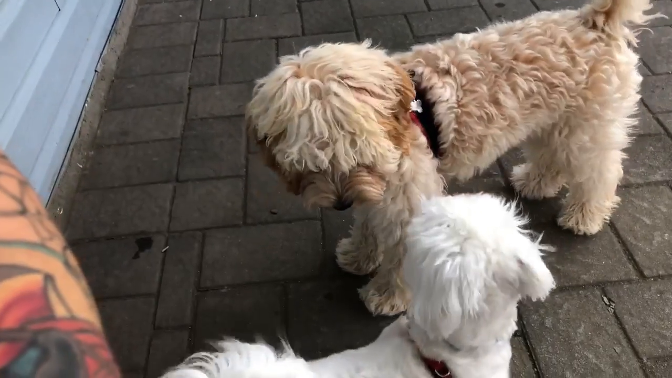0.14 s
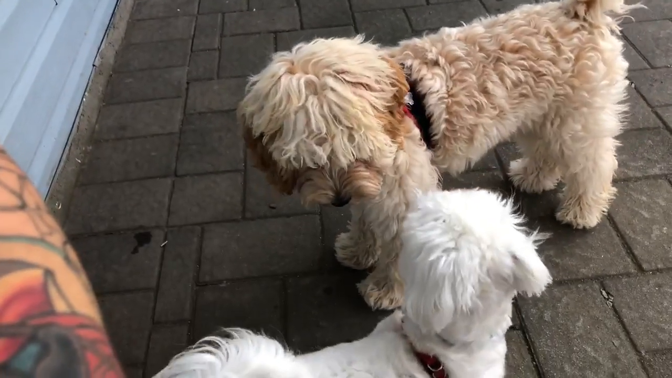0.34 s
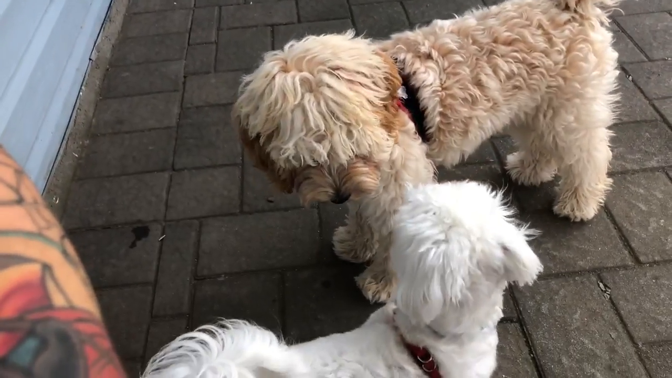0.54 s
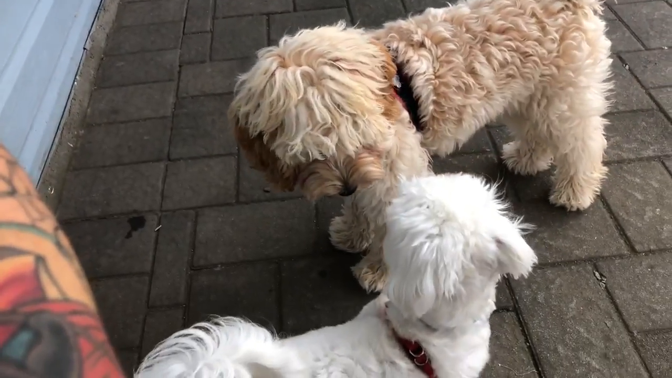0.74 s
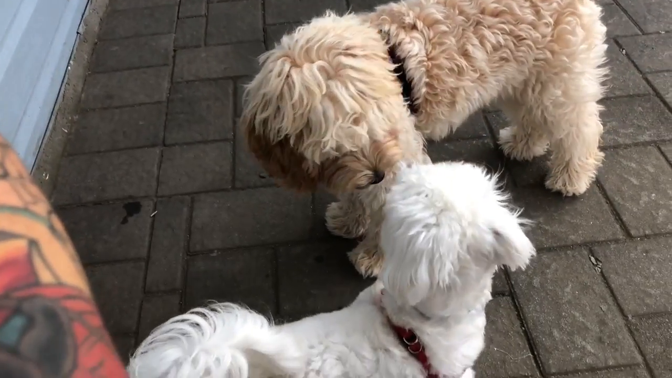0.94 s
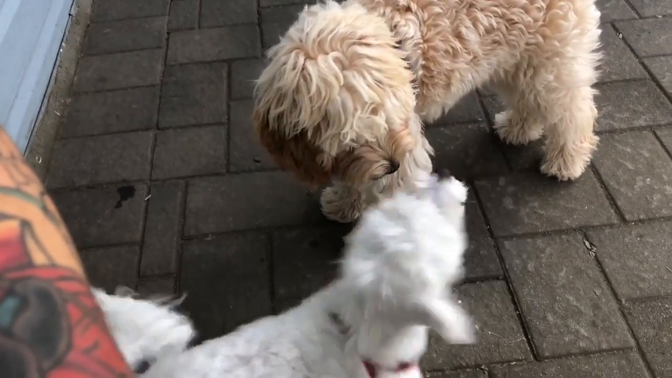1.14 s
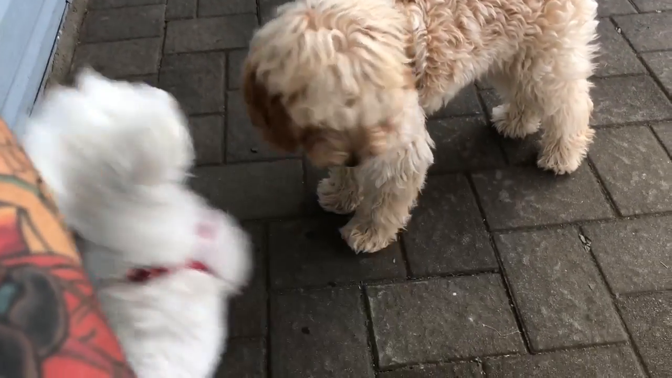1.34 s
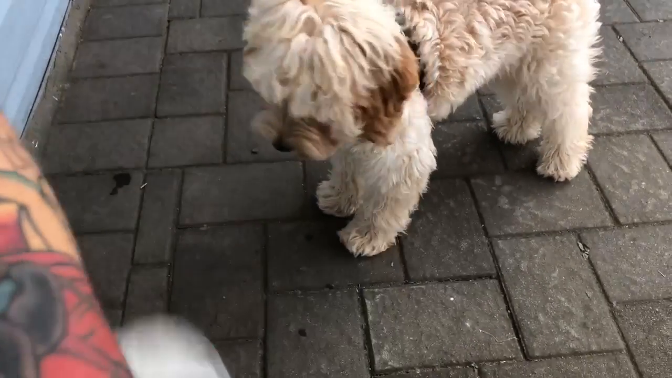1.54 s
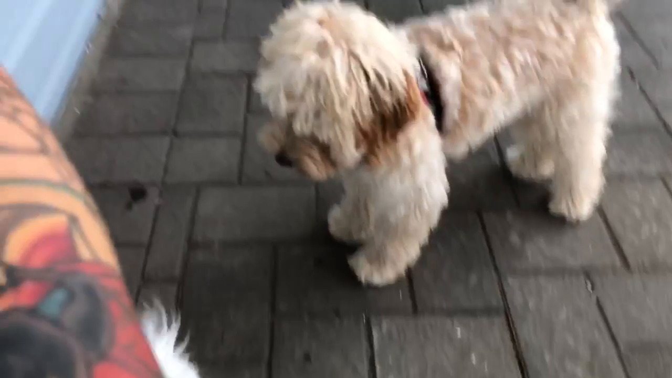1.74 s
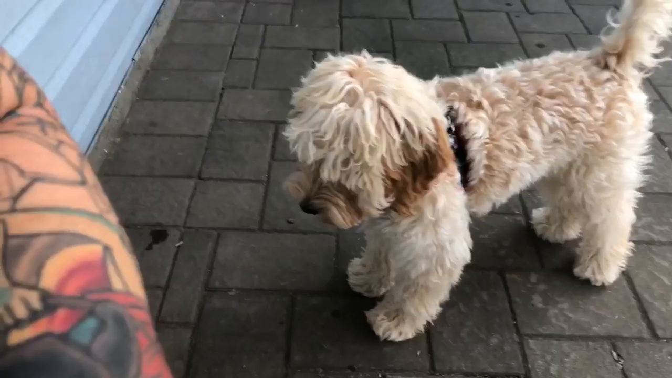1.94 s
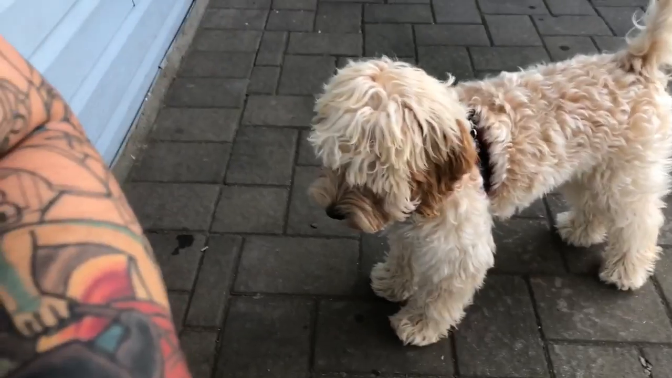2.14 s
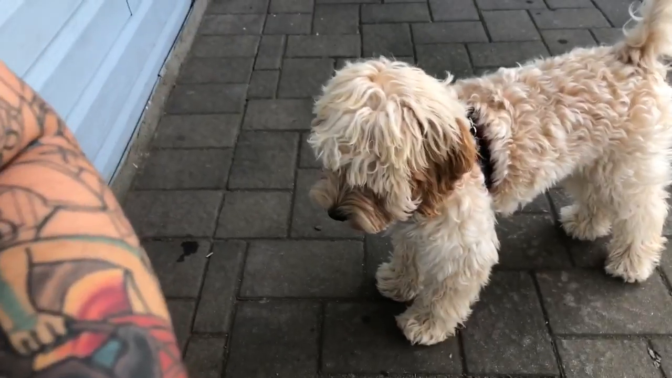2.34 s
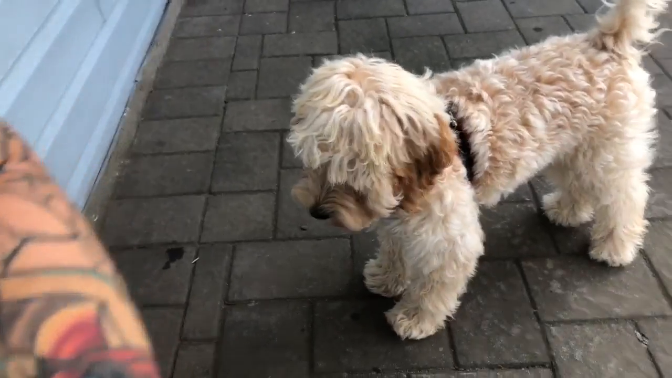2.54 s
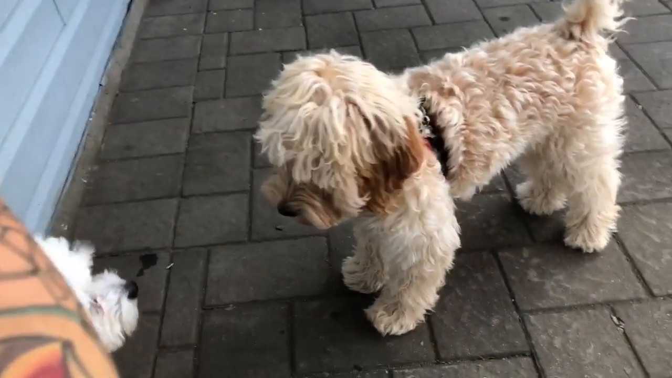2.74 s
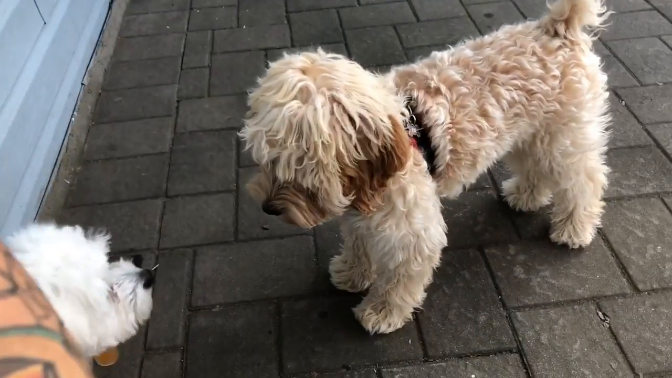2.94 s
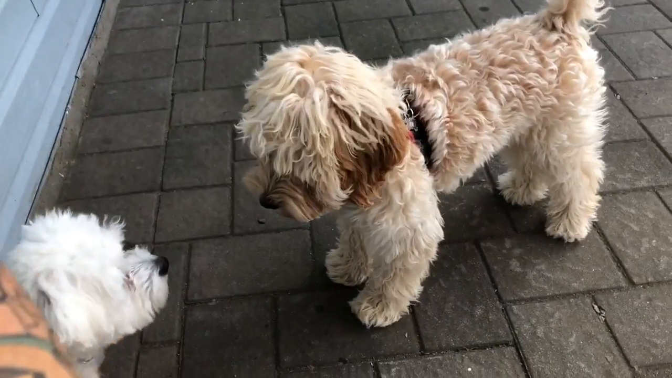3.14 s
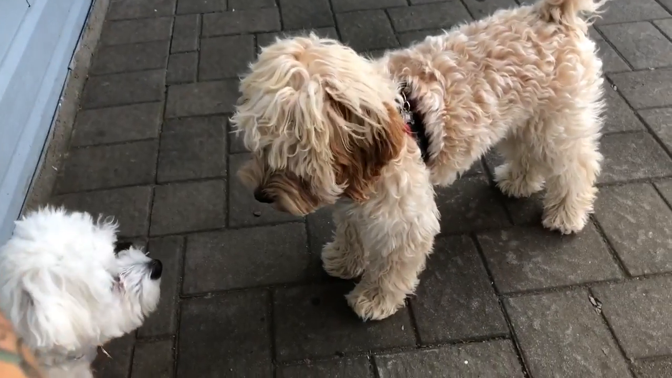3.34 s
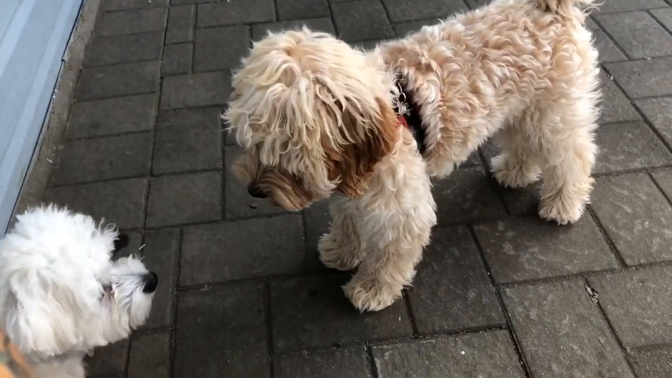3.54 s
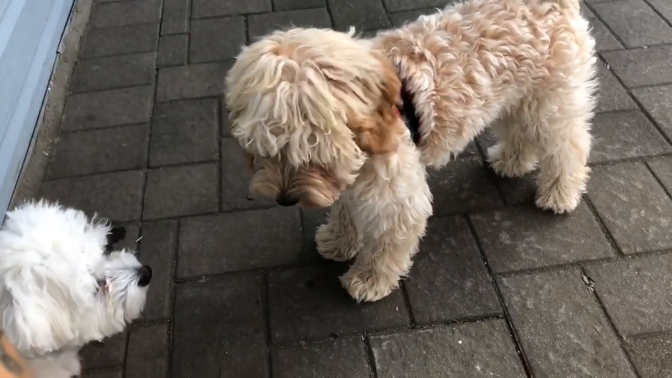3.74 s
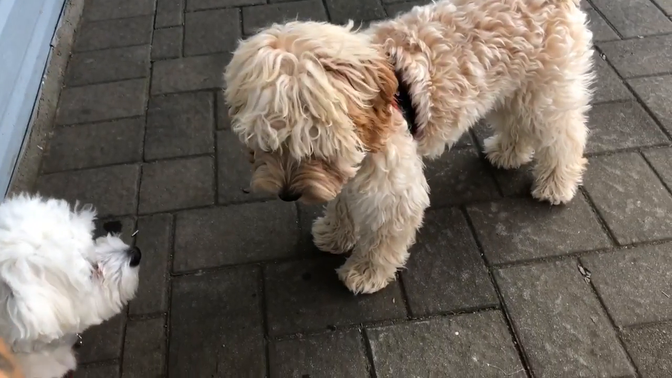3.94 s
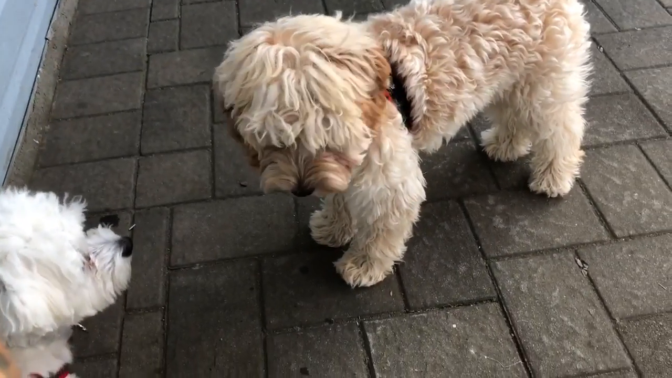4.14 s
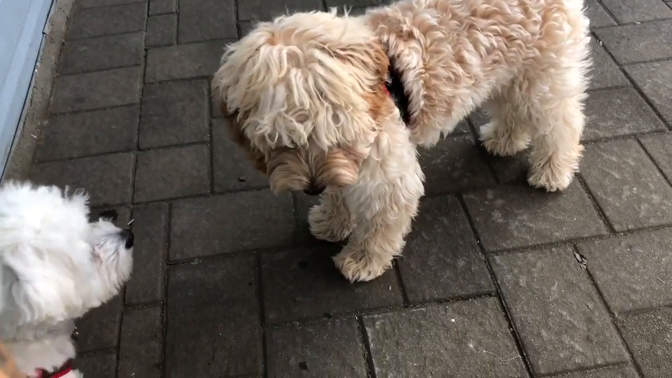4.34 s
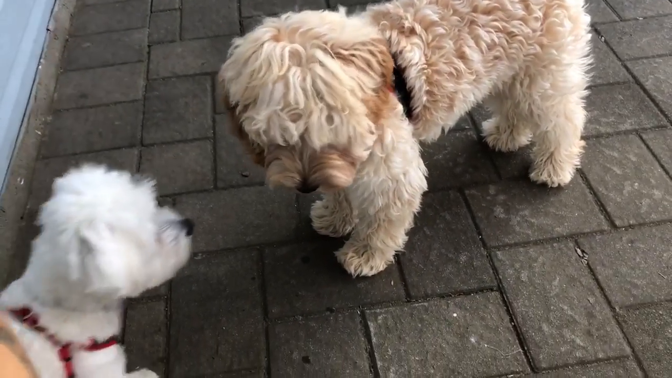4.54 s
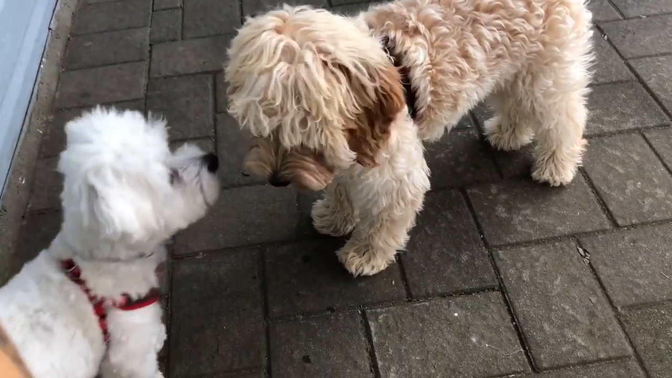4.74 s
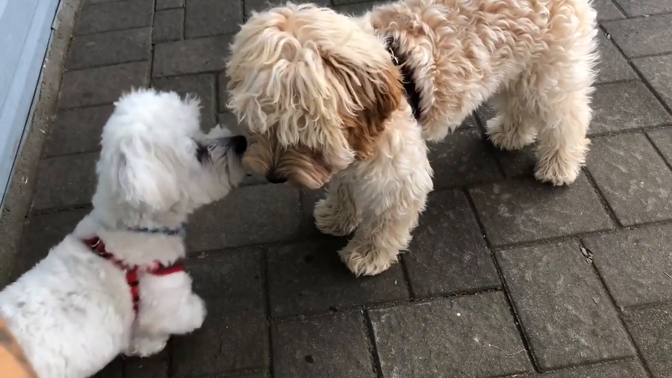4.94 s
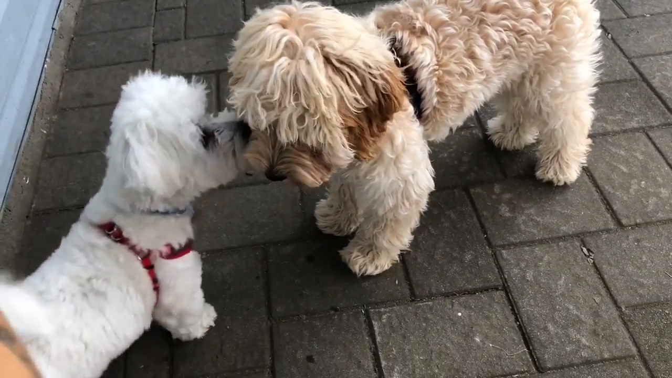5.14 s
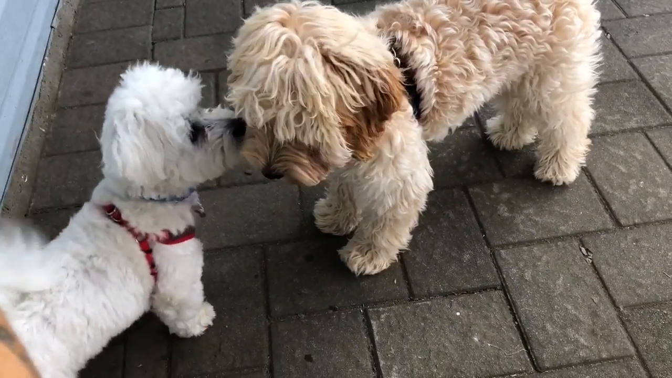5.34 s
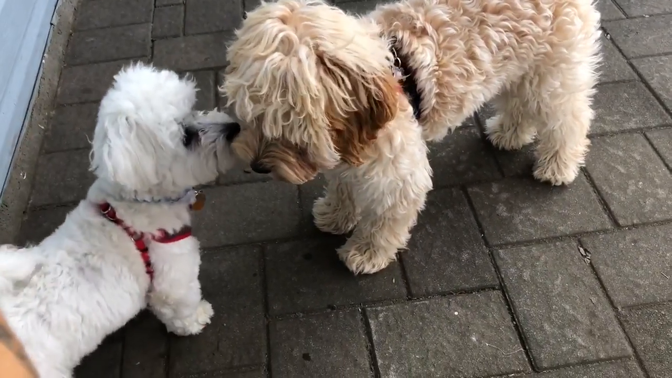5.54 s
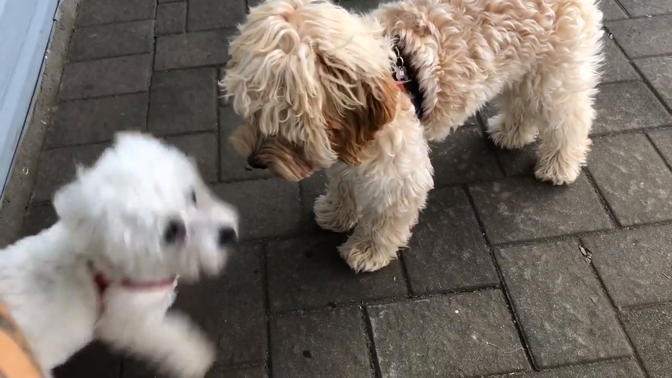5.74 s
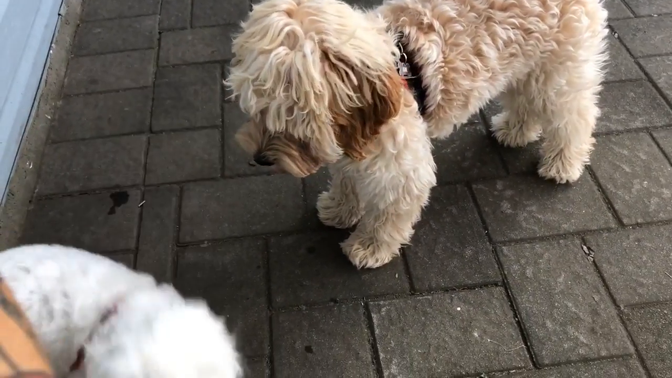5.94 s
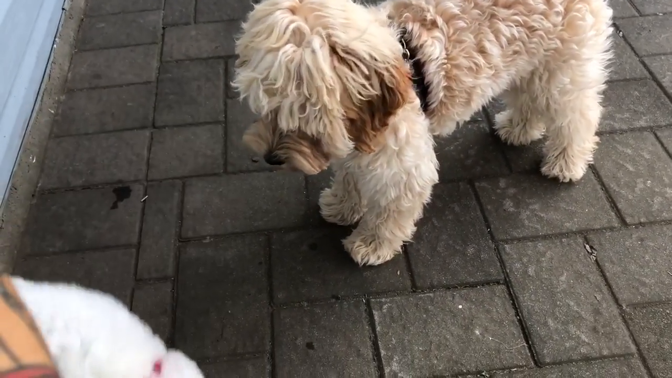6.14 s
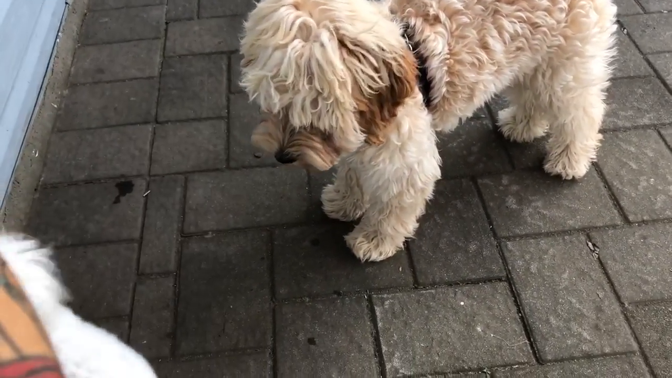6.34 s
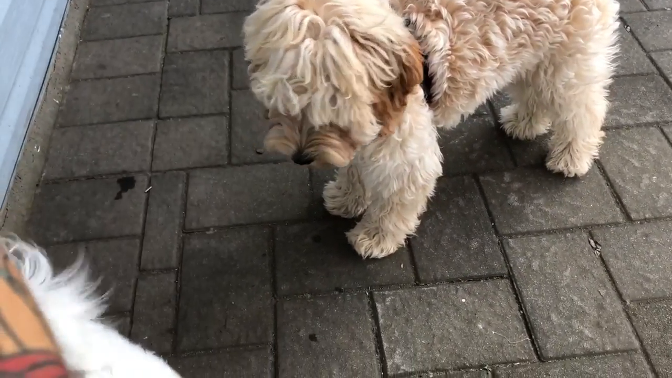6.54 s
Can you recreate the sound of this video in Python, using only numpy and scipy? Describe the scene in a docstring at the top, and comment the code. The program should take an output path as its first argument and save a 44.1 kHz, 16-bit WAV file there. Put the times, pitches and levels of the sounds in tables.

```python
"""Two dogs shuffle about on a paved yard, under far bird calls and over a low outdoor rumble.
Soft rattles of a dog's collar open the scene: modal tags and ring, driven by showers of contacts.
A far bird chirps in pitched noise; then the rattles grow hard and dense, with fur and strap rustling.
Amid them two rubs squeak as falling stick-slip tones; paws scuff here and there in swells of noise.
After a calmer stretch of hoarse calls, a second, mostly softer group of rattles ends the scene."""
import sys
import numpy as np
from scipy import signal
from scipy.fft import rfft, irfft
from scipy.io import wavfile
from scipy.ndimage import uniform_filter1d

SR = 44100
rng = np.random.default_rng(int(sys.argv[2]) if len(sys.argv) > 2 else 0)


def to_wav(sig):
    """Store sig (one row per channel, or 1-D mono) as 16-bit WAV at the path in sys.argv[1].

    Samples outside -1..1 are clipped; the rate is SR.
    """
    pcm = np.clip(np.atleast_2d(sig), -1, 1) * 32767
    pcm = np.round(pcm).astype(np.int16)
    wavfile.write(sys.argv[1], SR, pcm.T)  # frames by channels


N = 294588

# rattles on the collar, levels before the collar mix:
# [blow_s, decay_s, blow_db, scrape_db, top_modes_extra_db, struck_piece]
RATTLES = [ (0.047, 0.035, -48.5, -57, -3, "ring"), (0.063, 0.023, -55, -53, 2.5, "ring"),
           (0.109, 0.014, -44.5, -61, -12, "big"), (.137, 0.017, -52, -53, -3, "ring"),
           (0.261, 0.018, -45, -54, -9, "ring"), (0.276, 0.01, -54, -47.5, 3, "small"),
           (.466, .004, -60.5, -65.5, -2, "big"), (1.235, 0.0079, -42.5, -55, 0, "ring"),
           (1.252, 0.0081, -33.5, -44, -7, "big"), (1.336, 0.0054, -39, -33, 3, "small"),
           (1.343, 0.0075, -31, -54, -14.5, "ring"), (1.361, .011, -44, -60, -20, "big"),
           (1.37, 0.0044, -36.5, -53, -19, "ring"), (1.412, 0.022, -38, -47, -7, "ring"),
           (1.439, 0.0053, -38, -34.5, -13, "ring"), (1.449, 0.009, -24, -47, -13, "small"),
           (1.527, 0.0099, -43, -60, -10, "big"), (1.622, .02, -53, -62, -6, "ring"),
           (1.641, 0.023, -46.5, -38.5, 7, "ring"), (1.664, 0.029, -36.5, -55, -9, "ring"),
           (1.699, 0.011, -47, -58, 8, "ring"), (1.754, 0.021, -44.5, -47, -8, "ring"),
           (1.839, 0.026, -46.5, -45, 1, "ring"), (1.9, 0.014, -37, -46, -9, "big"),
           (1.943, 0.032, -47.5, -66, -9, "small"), (2.016, 0.016, -51.5, -60.5, 5, "ring"),
           (2.26, 0.02, -57, -58, 6, "ring"), (2.419, 0.023, -44.5, -45.5, -7, "small"),
           (2.502, 0.022, -48.5, -52, -6, "big"), (2.658, 0.0048, -62, -63, -6, "ring"),
           (3.26, .005, -67, -66, -1, "small"), (5.014, 0.0036, -56, -50, -4, "big"),
           (5.05, 0.0069, -39.5, -40, 5.5, "ring"), (5.071, 0.0076, -49, -40.5, 7, "small"),
           (5.256, 0.005, -56, -50.5, -2, "ring"), (5.392, 0.0068, -65, -56, 11, "small"),
           (5.545, .002, -72, -63, 0, "ring"), (5.811, 0.0079, -61, -49, 2, "ring"),
           (5.887, 0.017, -62, -60.5, -2, "ring"), (5.943, 0.017, -38, -45.5, -11, "ring"),
           (6.019, 0.018, -42, -47.5, 2, "big"), (6.155, 0.024, -64.5, -70, -13, "ring"),
           (6.473, 0.019, -60, -59, 2, "small"), (6.599, .026, -69.5, -67, 9, "small")]
# vibration modes of a small tag: [pitch_hz, level_db, free_t60_s]
SMALL_TAG = [(6688, 0, .28), (9240, -13, .12), (11283, 0, .27), (11335, -8, .2), (16520, -9, .2)]
# vibration modes of a big tag: [pitch_hz, level_db, free_t60_s]
BIG_TAG = [(3575, -13, .55), (6215, -7, .13), (6712, -5, .25), (13424, -3.5, .29), (13487, -4, .27),
           (14725, -7.5, .2), (14835, -1.5, .22)]
# vibration modes of the collar ring: [pitch_hz, level_db, free_t60_s]
COLLAR_RING = [(3945, -20, .2), (6065, -6, .15), (6128, -3, .18), (11970, -11, .12), (12050, -7, .18),
               (12128, -3, .24), (12205, -9, .18), (12322, -6, .3), (14340, -11, .1), (14495, -4, .2),
               (14555, -8, .14)]
# pieces on the collar, by name: [modes, level_when_neighbour_is_struck_db]
PIECES = {"small": (SMALL_TAG, -21.5), "big": (BIG_TAG, -2.5), "ring": (COLLAR_RING, -11.5)}
# colour of metal scraping on metal: [frequency_hz, gain_db]
SCRAPE_COLOUR = [(150, -36), (400, -25), (1200, -19), (2700, -35), (4200, 2), (5300, -11.5), (6300, 12),
                 (7600, 5), (9200, 0), (10700, -3.5), (12200, 1), (13000, -4), (14700, 1.5), (17000, 1)]
# how briskly the dogs turn, as a level that steers rustle and grazes: [time_s, level_db]
MOVEMENT = [(1.05, -90), (1.186, -53), (1.318, -61), (1.396, -62), (1.844, -49.5), (1.878, -43),
            (2.01, -59), (2.102, -61), (2.434, -73)]
# dry ticks of pieces that touch without ringing, levels before the band-pass: [start_s, level_db]
TICKS = [(1.196, -32), (1.598, -28), (2.613, -41)]
# rubs of the squeak, rate before timing scatter: [start_s, peak_db, hold_s, release_s, slips_per_s]
RUBS = [(1.8353, -17, .001, 0.011, 160), (1.8897, -18, 0.0097, 0.0077, 250)]
# colour of the rubbing's echo off the house: [frequency_hz, gain_db]
RUB_ECHO_COLOUR = [(90, -7), (180, 14.5), (340, 1), (620, -1.5), (820, -8), (1200, -4.5), (1600, -6),
                   (2000, -9), (2700, -4), (6000, -9)]
# paws padding and scuffing, fur brushing: [peak_s, level_db, half_length_s, centre_hz]
SCUFFS = [(0.676, -63, 0.056, 4640), (1.179, -58, 0.069, 1380), (1.654, -46, 0.0043, 2370),
          (1.667, -47.5, .017, 5030), (1.858, -38, 0.015, 207), (1.905, -41, 0.012, 4660),
          (2.458, -59.5, 0.022, 785), (2.691, -62, 0.016, 810), (3.628, -57, 0.011, 131),
          (3.754, -60, 0.011, 755), (4.506, -59.5, .015, 6950), (5.762, -62, 0.023, 3600)]
# chirps of a distant bird: [peak_s, pitch_hz]
CHIRPS = [(.464, 2070), (.542, 2350), (.629, 2310), (.709, 2270), (.823, 2140), (.95, 1950), (1.075, 1960)]
# hoarse calls of another distant bird: [peak_s, level_db, half_length_s, pitch_hz]
CAWS = [(.223, -65, 0.065, 3910), (2.348, -68.5, 0.14, 4850), (3.333, -67.5, 0.089, 3870),
        (3.969, -65.5, 0.11, 3790), (4.926, -59.5, .045, 3870), (4.99, -56.5, 0.043, 3050),
        (5.379, -64.5, 0.087, 3830)]
# spectrum of the outdoor air, relative: [frequency_hz, density_db_per_hz]
YARD_COLOUR = [(15, -39), (25, -37), (51, -4.5), (79, -0.5), (144, -5.5), (180, -6), (206, -9.5),
               (295, -13.5), (388, -19), (483, -19.5), (1440, -32), (4090, -36.5), (9580, -45.5),
               (14800, -51), (17500, -47)]

# harder blows put more of their energy into the high modes
USUAL_BLOW_DB, LOW_MODES_DB, LOW_MODES_DB_PER_DB, LOW_MODES_MAX_DB = -56.5, -3, -0.42, -5
# the longer a rattle, the looser the pieces hang and the more they ring on
FREE_DB, FREE_DB_PER_S = -14.5, 277.5
# light touches while the dogs move: blow relative to movement, scrape relative to blow
GRAZE_DB, GRAZE_S, GRAZE_SCATTER_DB, GRAZE_SCRAPE_DB = -5.5, 0.0119, 9, -8
# glide of each slip, before pitch scatter, and its decay
SLIP_START_HZ, SLIP_END_HZ, SLIP_DECAY_S = 1710, 490, 0.0027
# the chirps grow louder from the first
CHIRP_DB, CHIRP_DB_PER_S, CHIRP_S, CHIRP_FALL_HZ, CHIRP_WIDTH_HZ = -66, 6, 0.016, 170.7, 290
CAW_FALL_HZ, CAW_WIDTH_HZ = 198.8, 780
YARD_DB = -52.5
TOP_HZ = 17200


def collar(scrape_mix_db=-2, ring_mix_db=-2):
    """Each rattle scrapes, rings the struck piece and, more weakly, its neighbours; the paving echoes."""
    metal, scrapes = np.zeros(N), np.zeros(N)
    t = np.arange(-SR // 50, SR // 3) / SR
    attack = (t > 0) & (t < .016)
    for blow_s, decay_s, blow_db, scrape_db, top_db, struck in RATTLES + grazes():
        drive = rattle(t, decay_s)
        low_db = LOW_MODES_DB + LOW_MODES_DB_PER_DB * (blow_db - USUAL_BLOW_DB)
        low_db = min(low_db, LOW_MODES_MAX_DB)
        free_db = FREE_DB + FREE_DB_PER_S * decay_s
        for name, (modes, neighbour_db) in PIECES.items():
            level_db = blow_db + (0 if name == struck else neighbour_db)
            ringing = ring(drive, attack, modes, low_db, top_db, free_db)
            add(metal, blow_s + t[0], undb(level_db) * ringing)
        # hard blows go into the ringing; rough edges smear each contact into a short burst of grit
        grit = rng.standard_normal(SR // 700)
        scrape = signal.fftconvolve(np.tanh(drive), grit)[:len(t)]
        add(scrapes, blow_s + t[0], undb(scrape_db) * scrape / np.std(scrape[attack]))
    direct = undb(ring_mix_db) * metal + undb(scrape_mix_db) * colour(scrapes, SCRAPE_COLOUR)
    return direct + undb(-15) * echo(direct, t60=.22, delay_s=.003)


def rattle(t, decay_s, contacts_per_s=2200, scatter_db=4, main_blow=2.5, lead_s=0.0007, lead_share=.15):
    """Pieces graze, meet in one main blow and part in dying bounces; long rattles build up more slowly."""
    hit = rng.random(len(t)) < contacts_per_s / SR
    size = undb(scatter_db * np.clip(rng.standard_normal(len(t)), -2, 2))
    size = size * rng.choice([-1, 1], len(t))
    rise_s = lead_s + lead_share * decay_s
    drive = hit * size * np.exp(-np.maximum(t / decay_s, -t / rise_s))
    drive[np.searchsorted(t, 0)] = main_blow
    return drive


def ring(drive, attack, modes, low_db, top_db, free_db, held_s=0.012, held_db=-1):
    """Each mode sums a brief detuned part, damped by leaning neighbours, and a free part."""
    out = 0
    for hz, mode_db, t60 in modes:
        # the struck spot favours the low or the top modes
        extra_db = np.interp(hz, [7000, 11000, 13700, 14300], [low_db, 0, 0, top_db])
        held_detune, free_detune = rng.standard_normal(2) * [.004, .0006]
        held = resonate(drive, hz * (1 + held_detune), held_s)
        free = resonate(drive, hz * (1 + free_detune), t60 / np.log(1000))
        # both parts are sized by their strength just after the blow
        held = undb(held_db) * held / np.std(held[attack])
        free = undb(free_db) * free / np.std(free[attack])
        out = out + undb(mode_db + extra_db) * (held + free)
    return out


def resonate(drive, hz, decay_s):
    """One mode as a complex resonator, its ringing falling to 1/e in decay_s."""
    pole = np.exp((2j * np.pi * hz - 1 / decay_s) / SR)
    return signal.lfilter([1], [1, -pole], drive).imag


def grazes(count=14):
    """Light touches at random times, their levels scattered around the dogs' movement."""
    edges = np.linspace(MOVEMENT[0][0], MOVEMENT[-1][0], count + 1)
    chance = rng.random((count, 2))
    times = edges[:-1] + chance[:, 0] * np.diff(edges)
    levels = movement_db(times) + GRAZE_DB + GRAZE_SCATTER_DB * (2 * chance[:, 1] - 1)
    return [(s, GRAZE_S, db, db + GRAZE_SCRAPE_DB, 0, "ring") for s, db in zip(times, levels)]


def movement_db(s):
    """How briskly the dogs move at time s, interpolated in decibels."""
    return np.interp(s, *np.transpose(MOVEMENT), left=-120, right=-120)


def ticks(decay_s=.0002):
    """Pieces touch without ringing: bright noise clicks that die at once."""
    out = np.zeros(N)
    t = np.arange(SR // 100) / SR
    for start_s, level_db in TICKS:
        add(out, start_s, undb(level_db) * rng.standard_normal(len(t)) * np.exp(-t / decay_s))
    return band(out, 2500, 18000, order=1)


def squeak(glide_s=0.00143, rise_s=0.00054, rasp=0.29, echo_db=-4, timing_scatter=.25,
           pitch_scatter=0.15, later_slips_db=-3):
    """Stick-slip: a rub breaks loose and goes on in uneven slips, each a short tone falling in pitch."""
    out = np.zeros(N)
    t = np.arange(SR // 20) / SR
    glide_hz = SLIP_END_HZ + (SLIP_START_HZ - SLIP_END_HZ) * np.exp(-t / glide_s)
    envelope = (1 - np.exp(-t / rise_s)) * np.exp(-t / SLIP_DECAY_S)
    for start_s, peak_db, hold_s, release_s, slips_per_s in RUBS:
        age = 0  # seconds since the rub broke loose
        for gap, pitch in rng.standard_normal((10, 2)):
            slip_hz = glide_hz * (1 + pitch_scatter * pitch)
            tone = np.sin(2 * np.pi * np.cumsum(slip_hz) / SR)
            grit = rasp * unit(band(rng.standard_normal(len(t)), 480, 1600))
            force = undb(peak_db + later_slips_db * (age > 0))
            force = force * np.exp(-max(age - hold_s, 0) / release_s)
            add(out, start_s + age, force * (tone + grit) * envelope)
            age += np.exp(timing_scatter * gap) / slips_per_s
    return out + undb(echo_db) * colour(echo(out, t60=0.27, delay_s=0.0073), RUB_ECHO_COLOUR)


def rustle(rustle_db=-4, grain_db=4, flutter_db=3.5):
    """Fine gritty friction noise of strap and fur, swelling as the dogs move."""
    grains = rng.standard_normal(N) * undb(grain_db * rng.standard_normal(N))
    level_db = movement_db(np.arange(N) / SR) + rustle_db + flutter_db * walk(70)
    return unit(band(grains, 2800, 8930, order=1)) * undb(level_db)


def scuffs(grain_db=4):
    """Paws and fur rub in soft swells of gritty, band-limited friction noise."""
    out = np.zeros(N)
    t = np.arange(-SR // 4, SR // 4) / SR
    for peak_s, level_db, half_length_s, hz in SCUFFS:
        grains = rng.standard_normal(len(t)) * undb(grain_db * rng.standard_normal(len(t)))
        friction = unit(band(grains, hz / 1.36, hz * 1.19, order=1))
        add(out, peak_s + t[0], undb(level_db) * friction * np.exp(-(t / half_length_s) ** 2))
    return out


def birds():
    """One far bird gives a series of short chirps; another calls hoarsely now and then."""
    out = np.zeros(N)
    t = np.arange(-SR // 4, SR // 4) / SR
    for peak_s, hz in CHIRPS:
        level_db = CHIRP_DB + CHIRP_DB_PER_S * (peak_s - CHIRPS[0][0])
        chirp = bird_note(t, CHIRP_S, hz, CHIRP_FALL_HZ, CHIRP_WIDTH_HZ)
        add(out, peak_s + t[0], undb(level_db) * chirp)
    for peak_s, level_db, half_length_s, hz in CAWS:
        caw = bird_note(t, half_length_s, hz, CAW_FALL_HZ, CAW_WIDTH_HZ)
        add(out, peak_s + t[0], undb(level_db) * caw)
    return out


def bird_note(t, half_length_s, hz, fall_hz, width_hz):
    """One hoarse falling note, its carrier blurred by distance into a narrow band of noise."""
    pitch_hz = hz + fall_hz / 2 * np.clip(-t / half_length_s, -1, 1)
    phase = 2 * np.pi * np.cumsum(pitch_hz) / SR
    noise = rng.standard_normal(len(t)) + 1j * rng.standard_normal(len(t))
    blur = signal.sosfilt(signal.butter(2, width_hz / 2, fs=SR, output="sos"), noise)
    return unit((blur * np.exp(1j * phase)).real) * np.exp(-(t / half_length_s) ** 2)


def yard(hum_hz=179, hum_db=-66):
    """Far traffic rumble and air hiss as coloured noise, with a faint wavering hum."""
    swell_db = .35 * walk(5)
    air = unit(colour(rng.standard_normal(N), YARD_COLOUR)) * undb(YARD_DB + swell_db)
    hum = np.sin(2 * np.pi * np.cumsum(hum_hz + 4 * walk(12)) / SR)
    return air + hum * undb(hum_db + 2.4 * walk(5))


def echo(x, t60, delay_s):
    """Diffuse reflections off paving and walls: a decaying noise tail of unit energy."""
    t = np.arange(SR // 2) / SR
    tail = rng.standard_normal(len(t)) * np.exp(-np.log(1000) * t / t60) * (t > delay_s)
    return signal.fftconvolve(x, tail / np.linalg.norm(tail))[:N]


def walk(rate):
    """Slow random wander with rms 1, aiming at a new value rate times a second."""
    k = int(SR / rate)
    steps = np.repeat(rng.standard_normal(N // k + 1), k)
    return unit(uniform_filter1d(steps, k)[:N])


def colour(x, points):
    """Filter by a curve of (Hz, dB) points, interpolated over log frequency."""
    hz, db = np.transpose(points)
    f = np.maximum(np.arange(len(x) // 2 + 1) * SR / len(x), 1)
    return irfft(rfft(x) * undb(np.interp(np.log(f), np.log(hz), db)), len(x))


def band(x, lo_hz, hi_hz, order=2):
    """Band-pass filter."""
    edges = [lo_hz, min(hi_hz, SR / 2 - 1000)]
    return signal.sosfilt(signal.butter(order, edges, "band", fs=SR, output="sos"), x)


def undb(db):
    """Decibels to gain."""
    return 10 ** (np.asarray(db) / 20)


def unit(x):
    """Scale to rms 1."""
    return x / np.sqrt(np.mean(x ** 2))


def add(out, s, x):
    """Mix x into out from time s."""
    i = max(int(s * SR), 0)
    out[i:i + len(x)] += x[:max(N - i, 0)]


def scene():
    """All sources at one microphone."""
    return (collar() + ticks() + squeak() + rustle() + scuffs() + birds() + yard())[None]


def record(dry):
    """The phone cuts the extreme treble with a steep low-pass."""
    return signal.sosfilt(signal.ellip(10, .2, 70, TOP_HZ, fs=SR, output="sos"), dry)


dry = scene()
out = record(dry)
to_wav(out)
```